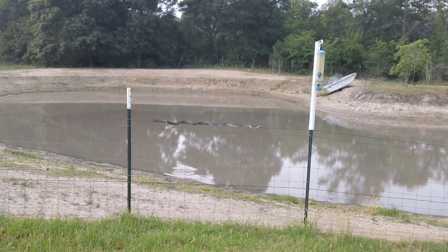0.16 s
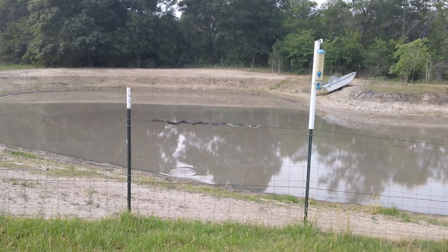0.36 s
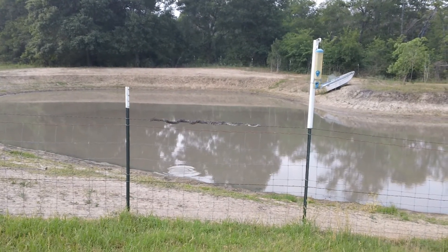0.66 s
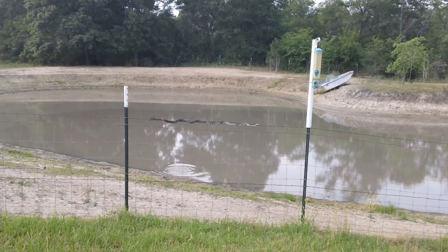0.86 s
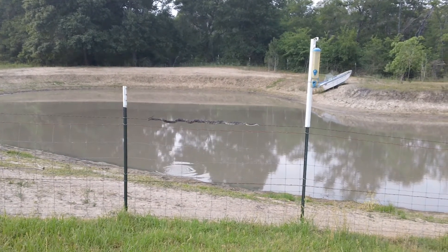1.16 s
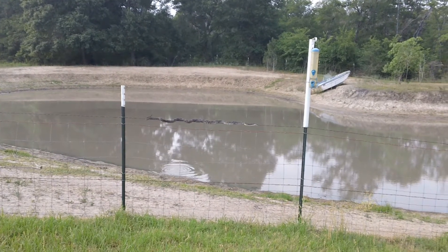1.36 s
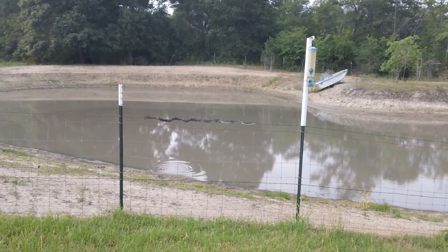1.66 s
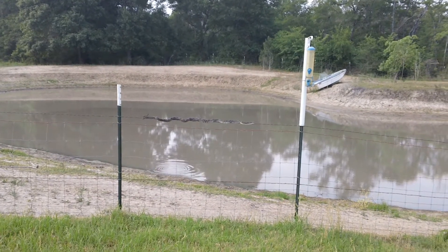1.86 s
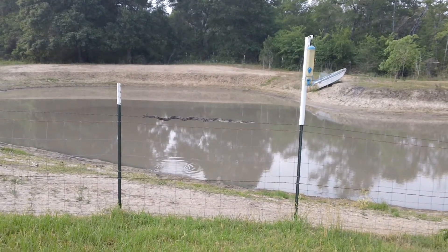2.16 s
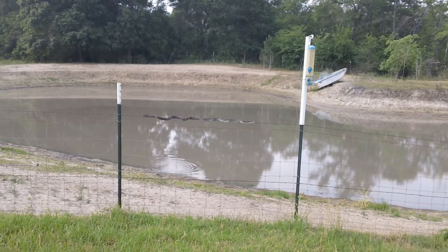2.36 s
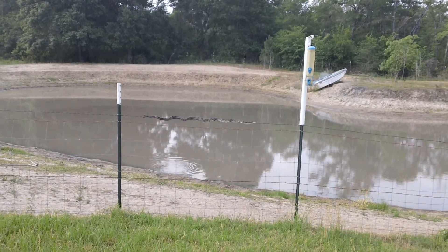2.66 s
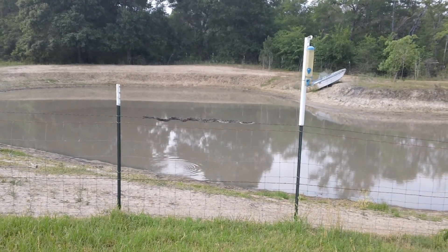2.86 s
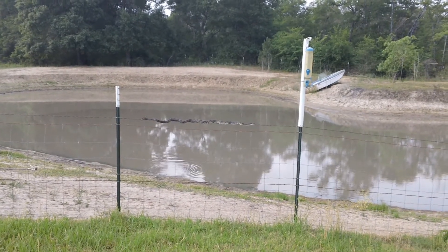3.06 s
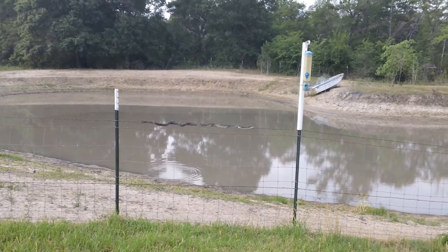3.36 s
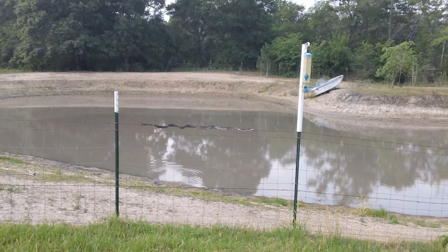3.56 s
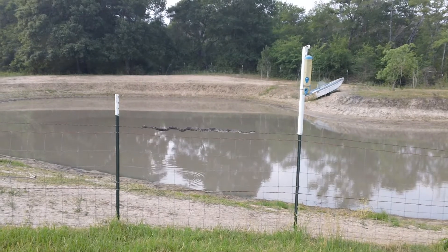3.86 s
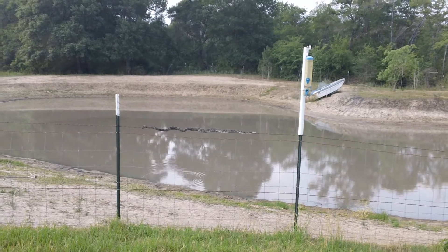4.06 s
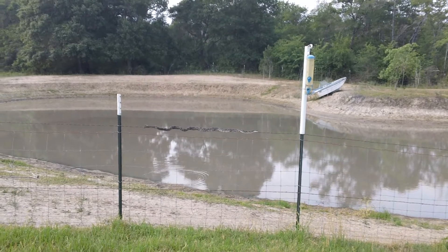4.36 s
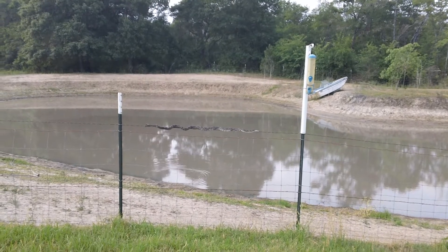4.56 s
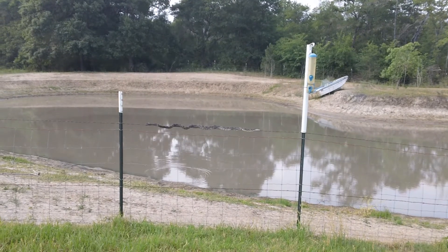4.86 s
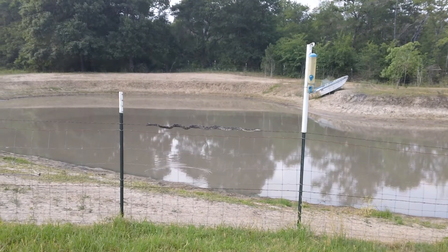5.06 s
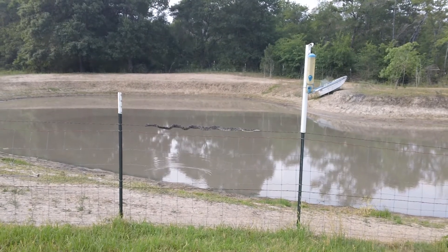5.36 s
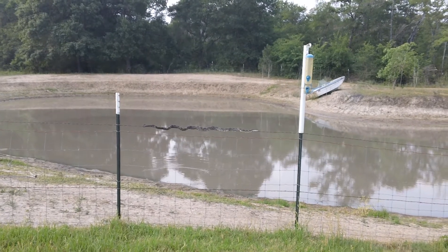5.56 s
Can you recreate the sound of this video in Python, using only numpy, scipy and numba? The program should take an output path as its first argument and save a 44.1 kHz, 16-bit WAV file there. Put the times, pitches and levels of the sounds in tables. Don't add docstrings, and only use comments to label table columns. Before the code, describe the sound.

Daytime pond edge with trees around, heard through a small camera microphone. A thin, scratchy insect drone near 5.5 kHz stays constant over soft low ambience, faint hiss and a weak distant hum near 120 Hz that slowly fades. Small dry focus-motor ticks come in short clusters throughout. At 0.15-1.0 s a bird deep in the wood scolds in ten quick, raspy, echoing pulses, with a sharp high chip at the start. Clear whistles follow at 0.84, 1.18 and 1.55 s, each drooping; fainter falling slurs repeat from 1.1 to 2.6 s. Wind buffets thud at 1.6-2.1 s. From 2.6 to about 4.6 s two warblers alternate rapid arched, chirpy phrases near 2.5 kHz, the second becoming dominant. A bright pip sounds at 3.0 s. The hardest wind thump, at 3.7 s, briefly ducks everything. Thin seeps and chips cluster around 4.2-4.9 s; gusts bump again near 5.05 s, and song restarts at 5.6 s.

```python
import sys
import numpy as np
from scipy import signal
from scipy.fft import rfft, irfft
from scipy.io import wavfile
from scipy.ndimage import uniform_filter1d
from numba import njit

SR = 44100
rng = np.random.default_rng(int(sys.argv[2]) if len(sys.argv) > 2 else 0)


def put_to_file(sound):
    columns = np.atleast_2d(sound).T
    safe = np.clip(columns, -1, 1)
    whole_steps = np.round(safe * 32767)
    wavfile.write(sys.argv[1], SR, whole_steps.astype(np.int16))


def ratio_of_db(decibels):
    return 10 ** (np.asarray(decibels, float) / 20)


N = 251808


def at_level(x, db):
    return x * ratio_of_db(db) / np.sqrt(np.mean(x ** 2))


def add(track, s, sound):
    i = max(int(s * SR), 0)
    track[i:i + len(sound)] += sound[:max(N - i, 0)]


def walk(rate):
    k = int(SR / rate)
    held = np.repeat(rng.standard_normal(N // k + 1), k)
    return 1.87 * uniform_filter1d(uniform_filter1d(held, k), k)[:N]


def ring(x, hz, width):
    return signal.lfilter(*signal.iirpeak(hz, hz / width, SR), x)


def noise(shape, swell_db, flicker_db):
    octaves = np.log2(np.maximum(np.arange(N // 2 + 1) * SR / N, 1))
    knots, db = np.transpose(shape)
    gain = ratio_of_db(np.interp(octaves, np.log2(knots), db)) * np.sqrt(SR / 2)
    spectrum = rfft(rng.standard_normal(N)) * gain
    swell, out = swell_db * walk(1.52), 0
    for octave in range(4, 15):
        share = np.clip(1 - abs(np.clip(octaves, 4, 14) - octave), 0, 1)
        out = out + irfft(spectrum * share, N) * ratio_of_db(swell + flicker_db * walk(12))
    return out


def syrinx(hz, gain):
    turn = 2 * np.pi * (np.cumsum(hz) / SR + rng.random())
    return np.sqrt(2) * gain * (np.sin(turn) + .01 * np.sin(2 * turn))


def notes(rows, blunt, lean):
    out = np.zeros(N)
    for s, length, first_hz, mid_hz, last_hz, db in rows:
        u = np.linspace(0, 1, int(length * SR))
        hz = first_hz * (1 - u) * (1 - 2 * u) + 4 * mid_hz * u * (1 - u) + last_hz * u * (2 * u - 1)
        late = lean * (1.9 if last_hz > first_hz else 1)
        add(out, s, syrinx(hz, ratio_of_db(db) * np.sin(np.pi * u ** late) ** blunt))
    return out


def bent(rows, bend):
    return [(s, length, a, a + bend * (b - a), b, db) for s, length, a, b, db in rows]


# f/Hz, level/dB per Hz
AIR_SHAPE = [(30, -98), (60, -70), (120, -79.5), (250, -75.5), (650, -78), (1000, -82.5), (1600, -87),
             (3200, -90.5), (4300, -91), (7000, -94.5), (10000, -99.5), (15000, -101)]


def air():
    return noise(AIR_SHAPE, .3, .8)


# f/Hz, level/dB per Hz
HISS_SHAPE = [(60, -112), (250, -103), (1000, -104), (4000, -109), (6000, -109), (8000, -105),
              (11000, -109), (15000, -109)]


def hiss():
    return noise(HISS_SHAPE, 0.21, 0.67)


def chorus(count=40, centre_hz=5442, spread_hz=258, width_hz=215.0):
    out = 0
    for tune, (rate, size) in zip(np.linspace(-1, 1, count), rng.standard_normal((count, 2))):
        clicks = np.zeros(N)
        gaps = SR / (150 + 30 * rate) * (1 + .08 * rng.standard_normal(2000))
        at = np.cumsum(gaps).astype(int)
        clicks[at[at < N]] = ratio_of_db(2.1 * size + 3.1 * tune)
        hz = centre_hz + spread_hz * tune
        out = out + ring(ring(clicks, hz, width_hz), hz, width_hz)
    return at_level(out * ratio_of_db(.7 * walk(9)), -50.5)


def pump(fade_db_s=0.74):
    hz = 122 + 1.0 * walk(4.5)
    gain = ratio_of_db(1.2 * walk(6) - fade_db_s * np.arange(N) / SR)
    return at_level(np.sin(2 * np.pi * np.cumsum(hz) / SR) * gain, -49.5)


# t/s, level/dB
GUSTS = [(0.0, -44.5), (0.65, -52), (1.49, -44.5), (1.73, -33.5), (1.89, -44.5), (2.05, -34), (2.46, -46),
         (3.23, -34), (3.44, -38), (3.62, -33), (3.86, -41), (4.15, -38), (4.25, -46.5), (5.04, -46),
         (5.06, -33), (5.14, -46.5), (5.37, -42), (5.71, -42)]
# f/Hz, level/dB per Hz
RUMBLE_SHAPE = [(20, -27), (35, -6.5), (60, 3.5), (110, -4), (200, -13.5), (400, -29), (800, -45.5)]


def wind():
    s, db = np.transpose(GUSTS)
    rumble = at_level(noise(RUMBLE_SHAPE, 0.45, 1.2), -0.5)
    return rumble * ratio_of_db(np.interp(np.arange(N) / SR, s, db))


def eddies(count=170, calm_db=-39.5, growth=1.53):
    chance = rng.standard_normal((count, 4)).T
    at = (np.arange(count) + .5 + 0.395 * chance[0]) * N / SR / count
    wind_db = np.interp(at, *np.transpose(GUSTS))
    db = -32 + growth * (wind_db - calm_db) + 2.5 * chance[1]
    hz, ms = 113 * np.exp(0.2 * chance[2]), 12.2 * np.exp(0.59 * chance[3])
    return list(zip(at, db, hz, ms))


# t/s, peak level/dB, f/Hz, length/ms
HARD_EDDIES = [(1.633, -20, 122, 6.2), (1.724, -18.5, 122, 5.2), (1.736, -15, 125, 9.5),
               (1.769, -18.5, 133, 8.2), (2.04, -15.5, 147, 3.8), (2.056, -19, 114, 8.9),
               (2.07, -19.5, 97, 20), (2.926, -21.5, 115, 9), (3.008, -14, 128, 4.9), (3.05, -20, 107, 9.2),
               (3.187, -25, 95, 22), (3.21, -23, 95.4, 35), (3.298, -24, 103.5, 15),
               (3.618, -14.5, 128, 7.3), (3.639, -17.5, 101, 9.9), (3.656, -20.5, 108, 18),
               (3.722, -10, 183, 6.1), (3.739, -8, 190, 6.2), (4.076, -22.5, 121, 20),
               (4.104, -23.5, 193, 14.5), (4.133, -22.5, 84, 11.6), (4.191, -23, 122, 7.2),
               (4.659, -18.5, 168.4, 6.4), (4.793, -18.5, 125, 7.8), (5.021, -19.5, 146, 6.6),
               (5.06, -17, 178, 10.7), (5.35, -18.5, 140, 5.4), (5.405, -20, 168, 3.8),
               (5.421, -19.5, 121, 5.7), (5.66, -20.5, 147, 6.9)]


def buffets():
    out = np.zeros(N)
    kicks = HARD_EDDIES + [e for e in eddies() if e[0] > .04]
    for (s, db, hz, ms), turn in zip(kicks, rng.random(len(kicks))):
        t = np.arange(-.04, .04, 1 / SR)
        phase = 2 * np.pi * (hz * t + turn)
        point = 0.16 + 0.34 * ratio_of_db(db)
        kick = sum(point ** k * np.cos((k + 1) * phase) for k in range(4))
        add(out, s + t[0], ratio_of_db(db) * np.exp(-.5 * (t / (0.00037 * ms)) ** 2) * kick)
    return out


# t/s, length/s, centre f/Hz, width/Hz, level/dB
RASP_CALLS = [
    (0, .14, 2500, 160, -59),
    (.27, .08, 2400, 160, -59),
    (.865, .13, 7100, 1500, -55),
    (3.075, .07, 6350, 300, -60),
    (4.05, .11, 7100, 1400, -61),
    (4.245, .06, 6200, 500, -58),
    (4.43, .07, 6200, 500, -58),
    (4.71, .1, 7200, 1500, -58),
]


def rasps():
    out = np.zeros(N)
    for s, length, hz, width, db in RASP_CALLS:
        u = np.linspace(0, 1, int(length * SR))
        band = ring(ring(rng.standard_normal(len(u)), hz, width), hz, width)
        add(out, s, at_level(band, db) * np.sin(np.pi * u ** 0.5))
    return out


# t/s, length/s, first f/Hz, last f/Hz, level/dB
SEEP_CALLS = [
    (.001, 0.017, 7700, 6900, -52),
    (1.706, .034, 7200, 6300, -56),
    (4.017, 0.049, 6800, 6300, -55),
    (4.205, 0.064, 7600, 6950, -49),
    (4.348, .087, 7000, 6560, -56),
    (4.511, 0.095, 7040, 6620, -51.5),
]


def seeps():
    return notes(bent(SEEP_CALLS, 0.23), blunt=0.45, lean=1.75)


# first step t/s, last step t/s
MOTOR_RUNS = [(.0229, .0229), (.0971, .2053), (.2961, .2961), (.4171, .5229), (.6949, .8085),
              (.8736, .9436), (1.1089, 1.1089), (1.188, 1.2999), (1.5036, 1.6741), (1.8437, 1.958),
              (2.127, 2.2428), (2.3184, 2.428), (2.596, 2.7639), (3.0031, 3.0031), (3.2347, 3.4056),
              (3.5742, 3.6899), (3.861, 4.0264), (4.1572, 4.1572), (4.199, 4.3641), (4.4268, 4.4797),
              (4.5571, 4.5571), (4.8964, 5.0137), (5.091, 5.144), (5.3632, 5.5878)]
# f/Hz, width/Hz, level/dB
BODY_MODES = [
    (2000, 900, -42),
    (4400, 620, -34),
    (7100, 1000, -45),
    (10700, 880, -40),
    (15100, 1600, -42),
]


def motor(step_s=.0545):
    steps, ticks = np.zeros(N), []
    for first, last in MOTOR_RUNS:
        ticks += [first, *(last - step_s * np.arange(round((last - first) / step_s)))]
    for s, (size, rebound) in zip(ticks, rng.standard_normal((len(ticks), 2))):
        add(steps, s - .0003, ratio_of_db([1.4 * size]))
        add(steps, s, -ratio_of_db([1.5 * rebound - 8]))
    out = 0
    for k, (hz, width, db) in enumerate(BODY_MODES):
        out = out + (-1) ** k * ratio_of_db(db) * ring(steps, hz, width)
    return ratio_of_db(15.5) * out


# t/s, level/dB
SCOLDS = [(0.155, -48.5), (0.249, -50.5), (.335, -49), (.42, -47), (0.511, -49), (.605, -51.5),
          (0.694, -48), (0.775, -54), (.865, -54), (.96, -53)]


def chatter(pulse_hz=404., rise=.11, length=.055, rough=.014):
    out, u = np.zeros(N), np.linspace(0, 1, int(length * SR))
    for s, db in SCOLDS:
        shake = uniform_filter1d(rng.standard_normal(len(u)), 100) * 10
        hz = pulse_hz * (1 - rise * (1 - u) ** 1.5 + rough * shake)
        turn = 2 * np.pi * np.cumsum(hz) / SR
        parts = zip(range(9, 14), (-9, 0, -2.5, -1, -8))
        stack = sum(ratio_of_db(part_db) * np.sin(k * turn) for k, part_db in parts)
        add(out, s, ratio_of_db(db) * stack * np.sin(np.pi * u ** 1.2))
    return out


# t/s, length/s, first f/Hz, last f/Hz, level/dB
CHIP_CALLS = [
    (.158, 0.02, 8060, 7070, -44.5),
    (4.218, .03, 6840, 6260, -45.5),
    (4.408, 0.024, 6570, 6070, -45.5),
    (4.86, 0.015, 7930, 7300, -42.5),
]


def chips():
    return notes(bent(CHIP_CALLS, .9), blunt=0.45, lean=1.75)


# t/s, length/s, first f/Hz, last f/Hz, level/dB
FAR_NOTES = [(.36, .06, 3530, 3240, -57), (.5, .14, 2070, 1820, -60), (1.063, 0.017, 2000, 2110, -45.5),
             (1.42, 0.026, 2000, 2080, -55), (1.455, .19, 2700, 2220, -53.5), (3.3, 0.12, 3030, 3210, -62),
             (3.638, .016, 2830, 2480, -48), (4.74, .06, 2370, 2320, -59), (5.055, .03, 2560, 2560, -60),
             (4.36, 0.088, 3530, 3610, -61), (5.16, 0.028, 2940, 2870, -61),
             (5.285, 0.063, 2640, 2635, -58), (5.456, .045, 2590, 2480, -58),
             (5.464, 0.04, 3750, 3480, -61)]


def far_notes():
    return notes(bent(FAR_NOTES, 0.478), blunt=0.33, lean=0.62)


# t/s, length/s, held f/Hz, last f/Hz, level/dB
LONG_WHISTLES = [
    (0.839, 0.16, 2693, 2360, -38),
    (1.184, 0.17, 2674, 2385, -35.5),
    (1.55, .173, 2652, 2395, -36),
]


def whistles(hook_hz=306.0, hook_s=0.00884, droop_s=0.049):
    out = np.zeros(N)
    for s, length, held_hz, last_hz, db in LONG_WHISTLES:
        t = np.arange(0, length, 1 / SR)
        droop = np.clip(1 - (length - t) / droop_s, 0, 1) ** 1.87
        hook = hook_hz * np.exp(-t / hook_s)
        hz = held_hz + hook + 12 * (.5 - t / length) - (held_hz - last_hz) * droop
        edges = np.clip(np.minimum(t / .006, (length - t) / 0.0051), 0, 1)
        swell = ratio_of_db(db - 9.9 * np.exp(-t / 0.031) - 1.1 * droop) * edges
        add(out, s, syrinx(hz, swell))
    return out


# middle t/s, level/dB
FALLING_SLURS = [
    (1.141, -54.5),
    (1.433, -55),
    (1.737, -53.5),
    (2.021, -53.5),
    (2.316, -56),
    (2.627, -54),
]


def slurs(length=.15):
    rows = [(s - length / 2, length, 2845, 2080, 1743, db) for s, db in FALLING_SLURS]
    return notes(rows, blunt=0.33, lean=0.62)


# t/s, length/s, first f/Hz, last f/Hz, level/dB
PIP_CALLS = [
    (1.35, 0.17, 4170, 4000, -60),
    (1.77, 0.066, 4110, 4000, -61),
    (1.962, 0.037, 3700, 4300, -53),
    (2.048, 0.036, 3650, 4250, -57),
    (2.148, 0.042, 3800, 4300, -58),
    (3.008, 0.027, 5980, 5840, -41),
    (3.072, 0.011, 5740, 6400, -55),
    (4.855, 0.0085, 8800, 7600, -51),
    (5.02, .021, 7500, 7000, -57),
    (5.275, .016, 6930, 7700, -49),
]


def pips():
    return notes(bent(PIP_CALLS, 0.506), blunt=0.53, lean=0.89)


# t/s, length/s, first f/Hz, last f/Hz, level/dB
ARC_CALLS = [
    (1.868, 0.058, 3800, 3970, -55),
    (5.633, 0.054, 8040, 6260, -46.5),
]


def arcs(rise_hz=286):
    rows = [(s, length, a, a + rise_hz, b, db) for s, length, a, b, db in ARC_CALLS]
    return notes(rows, blunt=0.45, lean=1.75)


def phrases(rows, phrase):
    out = []
    for s, top_hz, *dbs in rows:
        for (after, length, a, b, c), db in zip(phrase, dbs):
            out.append((s + after, length, top_hz * a, top_hz * b, top_hz * c, db))
    return out


# middle of arch t/s, top f/Hz, arch level/dB, quick drop level/dB, up-slur level/dB
FIRST_WARBLER = [(2.609, 2480, -64, -41, -53), (2.802, 2497, -36.5, -40, -51),
                 (2.983, 2484, -35, -35.5, -51), (3.163, 2478, -34.5, -37.5, -51),
                 (3.347, 2482, -35.5, -36.5, -54), (3.534, 2503, -35.5, -40, -51),
                 (3.726, 2490, -38, -42, -52), (3.905, 2460, -53.5, -58, -62), (4.085, 2450, -62, -60, -66),
                 (4.27, 2440, -61, -60, -64), (4.45, 2450, -56, -58, -64), (5.645, 2470, -62, -42, -57)]
SECOND_WARBLER = [(2.705, 2460, -50, -52, -58), (2.883, 2525, -44.5, -49, -58),
                  (3.069, 2490, -42, -47, -54), (3.249, 2474, -43.5, -50, -54),
                  (3.430, 2465, -43, -51, -56), (3.614, 2490, -40, -42.5, -41.5),
                  (3.797, 2492, -37.5, -41, -41.5), (3.971, 2504, -40.5, -41, -42),
                  (4.147, 2453, -40, -40, -43), (4.332, 2430, -39, -41, -44),
                  (4.523, 2387, -38.5, -43.5, -68)]
# start after middle of arch t/s, length/s, first, middle, last f as share of top
FIRST_PHRASE = [
    (-.028, .057, .95, 1.0, 0.878),
    (0.039, 0.0178, 1.09, 0.95, 0.94),
    (0.049, .075, .77, .825, .885),
]
SECOND_PHRASE = [
    (-.031, .062, .895, 0.99, .84),
    (.036, 0.0278, 1.14, .91, 0.81),
    (.058, 0.0503, .775, .815, .865),
]
# t/s, length/s, first f/Hz, last f/Hz, level/dB
SONG_OPENINGS = [
    (2.591, .046, 2507, 2150, -41),
    (5.632, 0.044, 2480, 2240, -43.5),
]


def warblers():
    rows = phrases(FIRST_WARBLER, FIRST_PHRASE) + phrases(SECOND_WARBLER, SECOND_PHRASE)
    song = notes(rows + bent(SONG_OPENINGS, .14), blunt=0.71, lean=0.98)
    return ratio_of_db(1.2) * ring(song, 2450, 1100.0)


def trees(x, t60_s=1.4, first_s=0.023):
    t = np.arange(int(1.5 * SR)) / SR
    tail = rng.standard_normal(len(t)) * ratio_of_db(-60 * t / t60_s) * np.clip(t / first_s - 1, 0, 1)
    return signal.fftconvolve(x, tail / np.sqrt(np.sum(tail ** 2)))[:N]


def scene():
    low = far_notes() + whistles() + slurs() + warblers()
    high = rasps() + seeps() + chips() + pips() + arcs()
    scold = chatter()
    far = trees(ratio_of_db(-13.0) * low + ratio_of_db(-10.0) * high + ratio_of_db(-3.5) * scold)
    near = trees(ratio_of_db(-11.5) * low + ratio_of_db(-10.5) * high + ratio_of_db(-14.0) * scold, t60_s=0.1, first_s=0.0047)
    birds = low + high + ratio_of_db(-0.5) * scold + near + far
    mid = birds + air() + chorus() + pump() + wind() + buffets() + motor()
    side = hiss()
    return np.array([mid + side, mid - side])


@njit
def follow(x, release):
    out, e = np.empty(len(x)), 1e-6
    for i in range(len(x)):
        e = max(abs(x[i]), e * release)
        out[i] = e
    return out


def low_pass(x):
    return signal.sosfilt(signal.butter(12, 16410, fs=SR, output="sos"), x)


def record(dry):
    hz = np.arange(N // 2 + 1) * SR / N
    off = (hz - 12530) / 1500
    notch = abs(off) / np.sqrt(1 + off ** 2)
    x = irfft(rfft(dry) * notch * (hz < 15310), N)
    peak = follow(x.mean(axis=0), np.exp(-1 / (.5 * SR)))
    duck = uniform_filter1d(np.minimum(ratio_of_db(-14) / peak, 1) ** 0.58, 200)
    return low_pass(x * duck)


dry = scene()
out = record(dry)
put_to_file(out)
```